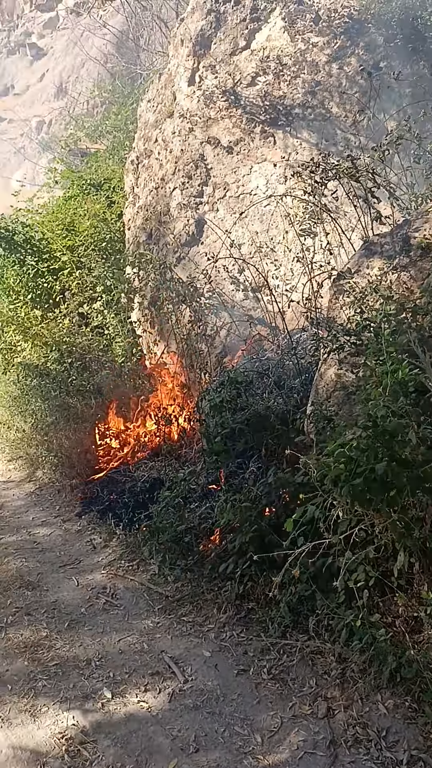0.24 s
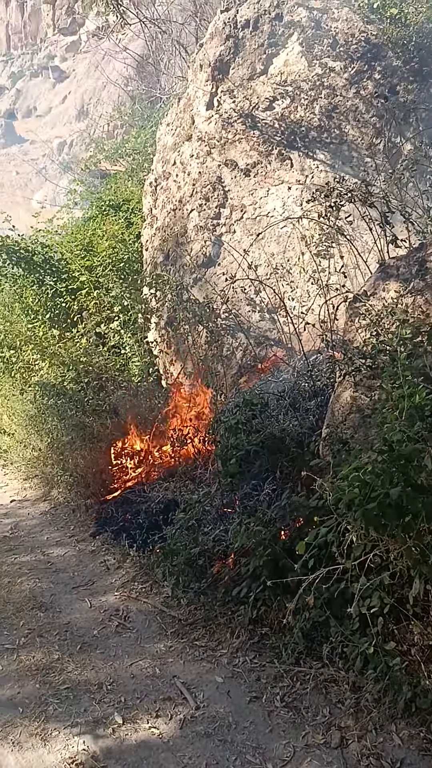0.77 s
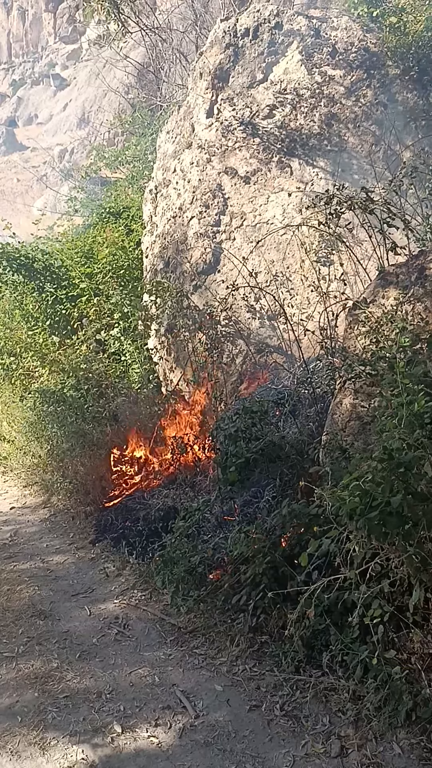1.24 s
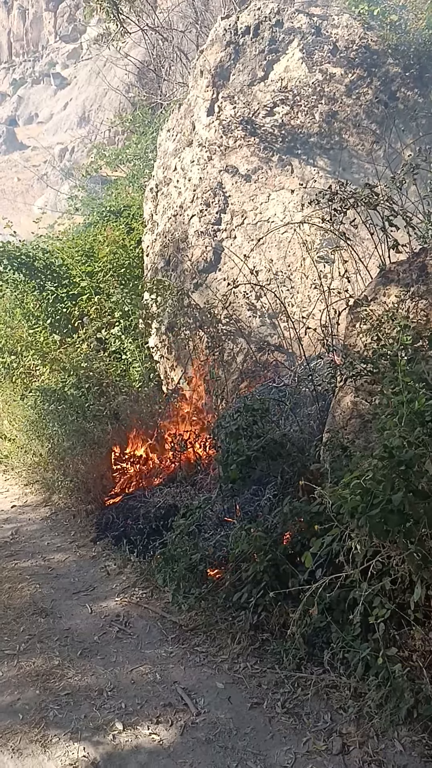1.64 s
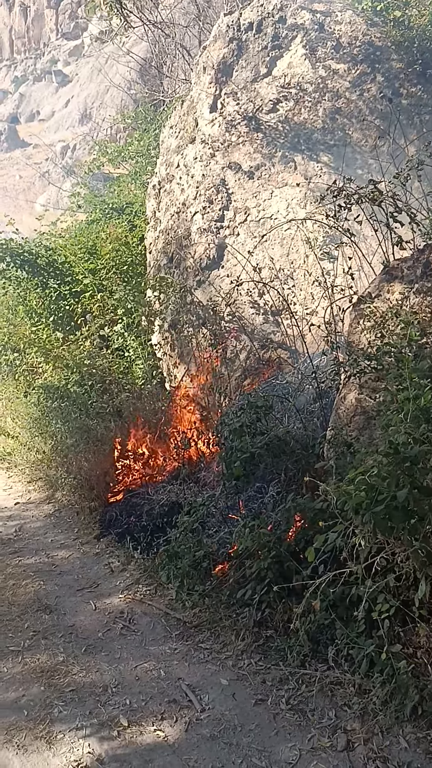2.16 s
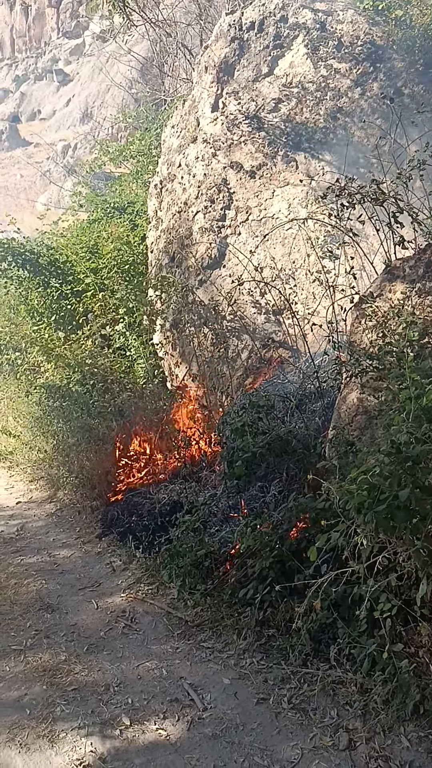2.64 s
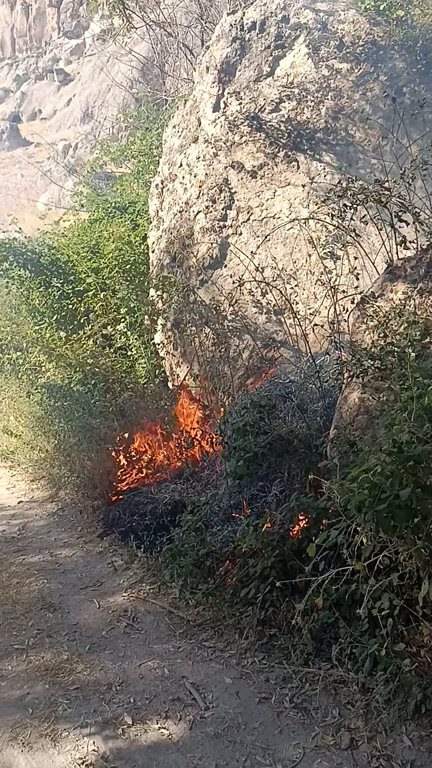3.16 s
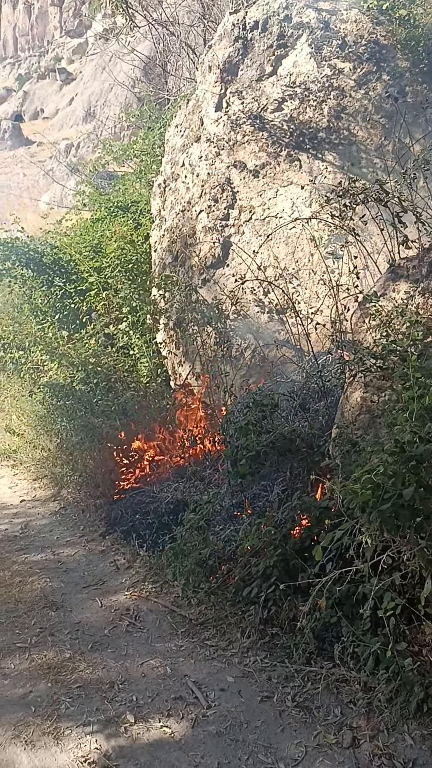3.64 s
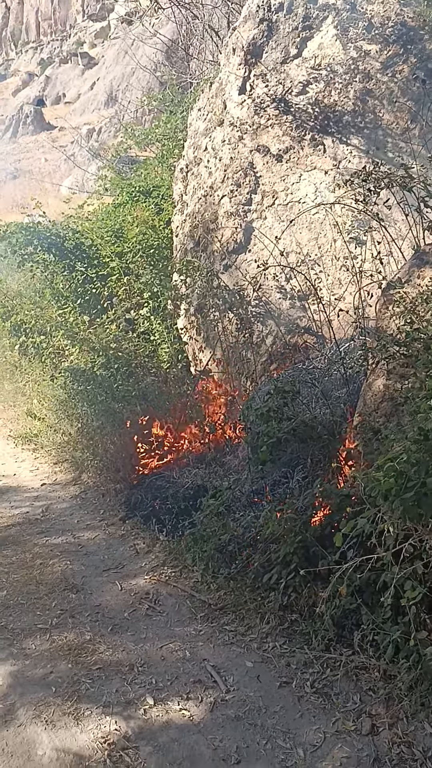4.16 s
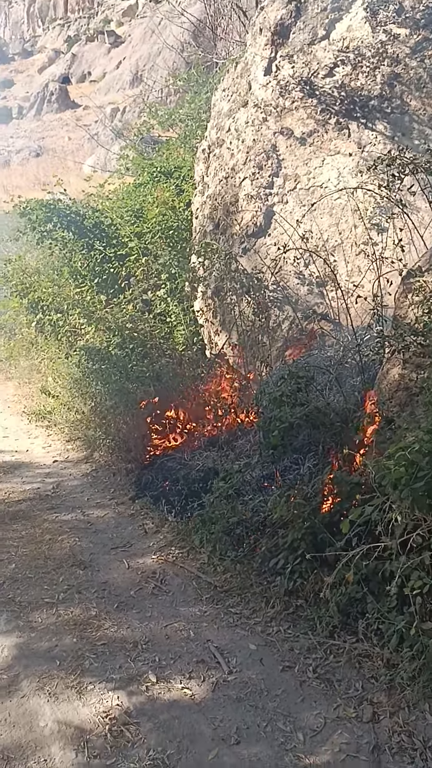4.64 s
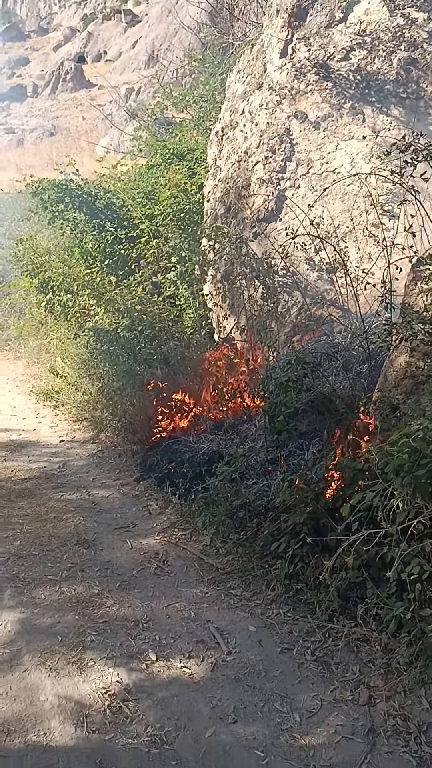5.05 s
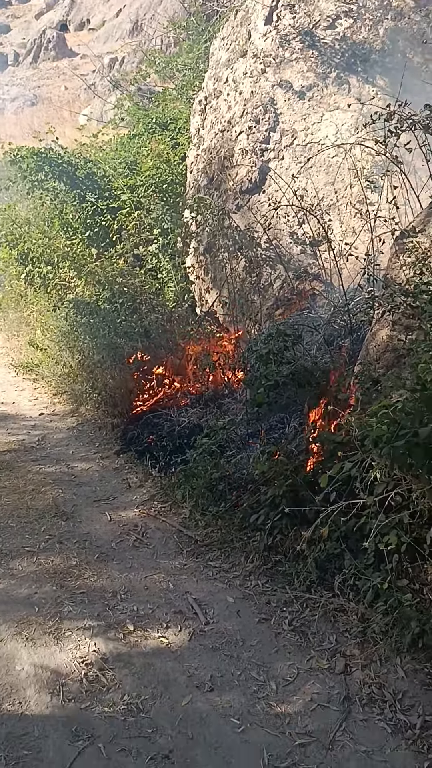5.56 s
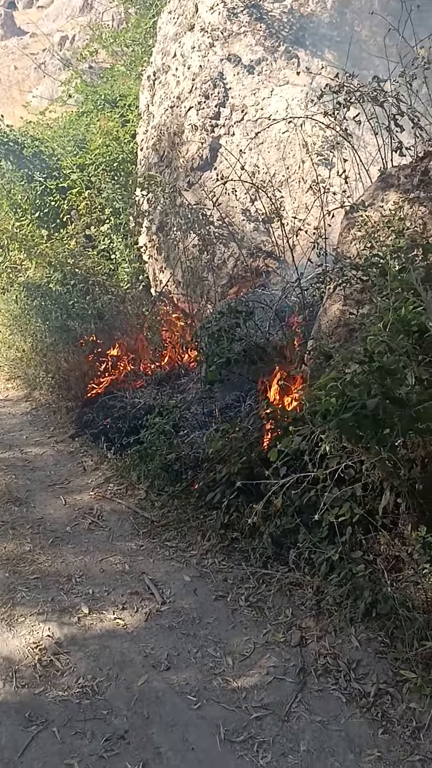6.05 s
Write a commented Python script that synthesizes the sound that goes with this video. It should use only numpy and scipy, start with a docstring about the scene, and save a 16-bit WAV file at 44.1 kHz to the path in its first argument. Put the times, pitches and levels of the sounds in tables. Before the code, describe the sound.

Burning twigs crackle and snap a few metres away, with soft wind rumble and a few light footsteps on grit.

```python
"""Twigs pop and crackle over a fine sizzle as dry brush burns beside a rock, a few metres from a phone.
Narrow bands of hiss swell and fade within the sizzle, and steam whistles briefly from twig ends.
Three footsteps crunch and snap on grit and dry leaves; eddies of the breeze thump on the microphone.
The phone's noise suppressor sinks the quiet moments band by band."""
import sys
import numpy as np
from scipy import signal
from scipy.fft import rfft, irfft
from scipy.io import wavfile
from scipy.ndimage import uniform_filter1d, minimum_filter1d

SR = 44100
rng = np.random.default_rng(int(sys.argv[2]) if len(sys.argv) > 2 else 0)


def to_wav(s):
    """Save 16-bit WAV."""
    ch = np.atleast_2d(s).T  # columns
    pcm = np.round(np.clip(ch, -1, 1) * 32767)  # PCM
    wavfile.write(sys.argv[1], SR, pcm.astype(np.int16))


N = 278428

# Course of the sizzle. Each row: time in seconds, level in dB, treble relative to that level in dB.
SIZZLE_LEVELS = [(0, -58, -21.5), (.6, -64.5, -15), (.87, -64, -38.5), (.92, -65.5, -12), (1.0, -61.5, -30),
                 (1.4, -58, -13.5), (1.45, -67, -14), (1.52, -60.5, -10), (1.8, -58, -11.5),
                 (1.9, -61.5, -12), (2.2, -66, 0), (2.35, -60.5, -6), (3.1, -59, -2), (3.32, -57.5, -3),
                 (3.53, -62.5, -0.5), (3.59, -64, 0.5), (4.05, -60, -2), (4.2, -64.5, 0), (4.55, -61.5, -3),
                 (4.63, -61.5, 1), (4.67, -69.5, 1.5), (4.76, -64, 2), (5.12, -63, -2.5), (5.22, -59, -4),
                 (5.38, -61, -2), (5.48, -59, 2.5), (5.6, -65, 1), (5.87, -59, -7.5), (6.12, -62, -13.5),
                 (6.17, -73.5, -1.5), (6.31, -66.5, -7.5)]
# Spectra of the three registers of a crackle. Each row: frequency in Hz, gain in dB.
BODY_SPECTRUM = [(900, -52.5), (1500, -13), (2300, -9), (3000, -6.5), (5800, -4), (7000, -9), (8200, -24),
                 (9500, -25.5)]
TREBLE_SPECTRUM = [(6500, -40.5), (8000, -11.5), (11000, -9.5), (13800, -15.5), (15000, 1), (15800, 2),
                   (16100, -39), (17500, -67)]
LOW_MID_SPECTRUM = [(170, 0), (350, -5.5), (550, -7.5), (930, 2), (1300, -8), (1700, -3), (3000, -45)]


def undb(db):
    """Decibels to amplitude ratio."""
    return 10 ** (np.asarray(db) / 20)


def unit(x):
    """Normalisation to rms 1."""
    return x / np.sqrt(np.mean(x ** 2))


def peak(x):
    """Normalisation to peak 1."""
    return x / np.abs(x).max()


def ring(x, hz, q):
    """A single resonance; q is centre frequency over bandwidth."""
    return signal.lfilter(*signal.iirpeak(hz, q, SR), x)


def highpass(x, hz, order=4):
    """High-pass filter, falling 6 dB per octave for each order."""
    return signal.sosfilt(signal.butter(order, hz, "high", fs=SR, output="sos"), x)


def colour(x, spectrum):
    """Minimum-phase filter, made by folding the cepstrum of the given spectrum."""
    hz, db = np.transpose(spectrum)
    grid_hz = np.maximum(np.fft.rfftfreq(4096, 1 / SR), 1)
    cepstrum = irfft(np.log(undb(np.interp(np.log(grid_hz), np.log(hz), db))))
    cepstrum[1:2048] *= 2
    cepstrum[2049:] = 0
    response = irfft(np.exp(rfft(cepstrum)))[:2048]
    return signal.fftconvolve(x, response)[:len(x)]


def curves(table):
    """Linear interpolation of a timed table's columns at every sample."""
    times, *columns = np.transpose(table)
    return [np.interp(np.arange(N) / SR, times, column) for column in columns]


def wander(per_s):
    """Slow fluctuation: random steps, smoothed twice; rms 1."""
    hold = int(SR / per_s)
    stairs = np.repeat(rng.standard_normal(N // hold + 1), hold)
    return unit(uniform_filter1d(uniform_filter1d(stairs, hold), hold)[:N])


def add(out, start_s, sound):
    """Superposition of a sound on the mix."""
    i = max(int(start_s * SR), 0)
    out[i:i + len(sound)] += sound[:N - i]


def grains(per_s, spread_db, tail_s):
    """Shot noise: random clicks whose decaying noisy tails add in power; rms 1."""
    hit, size = rng.random(N) < per_s / SR, rng.exponential(size=N)
    t = np.arange(int(.02 * SR)) / SR
    energy = hit * undb(2 * spread_db * np.minimum(size, 4))
    power = signal.fftconvolve(energy, np.exp(-2 * t / tail_s))[:N]
    return unit(np.sqrt(np.maximum(power, 0)) * rng.standard_normal(N))


def crackle(per_s, spread_db, tail_s, hiss, flicker_db, q):
    """Pieces of each size resonate at their own pitch, over plain clicks and hiss; rms 1."""
    out = grains(per_s, spread_db, tail_s) + hiss * rng.standard_normal(N)
    for hz in np.geomspace(1600, 7000, num=6):
        out += 0.34 * unit(ring(grains(per_s / 4, spread_db, tail_s), hz, q))
    return unit(out * undb(flicker_db * wander(30)))


def self_noise(level_db=-80.5):
    """The phone's electronics set a faint, steady noise floor."""
    # Spectrum of the floor. Each row: frequency in Hz, gain in dB.
    floor_spectrum = [(60, -38), (150, -4.5), (300, -8), (500, -13), (1200, -20), (2500, -24.5),
                      (8000, -29.5), (16000, -56)]
    return undb(level_db) * unit(colour(rng.standard_normal(N), floor_spectrum))


def breeze(width_cycles=0.53):
    """Turbulence: eddies crossing the microphone port make a fluttering rumble and short thumps."""
    # Course of the rumble. Each row: time in seconds, level in dB.
    rumble_levels = [(0, -51), (.4, -66), (.64, -51.5), (.7, -39.5), (.86, -71.5), (1.12, -56.5),
                     (1.28, -66.5), (1.7, -59.5), (1.9, -44.5), (2.07, -54.5), (2.26, -57), (2.42, -61.5),
                     (2.53, -59.5), (2.74, -60.5), (2.93, -49), (3.1, -68.5), (3.48, -87), (3.7, -63),
                     (4.06, -73), (4.16, -82.5), (4.69, -81.5), (4.8, -60.5), (5.15, -61.5), (5.27, -80),
                     (5.46, -76), (5.56, -60), (5.95, -50.5), (6.04, -63), (6.31, -50)]
    # Spectrum of the rumble. Each row: frequency in Hz, gain in dB.
    rumble_spectrum = [(20, -26.5), (40, -2.5), (80, 2), (150, -4.5), (230, -20), (330, -47), (500, -60)]
    # The strongest eddies. Each row: centre in seconds, envelope peak in dB, frequency in Hz.
    buffets = [(0.021, -39, 102), (0.152, -53, 66), (0.333, -41.5, 115), (0.584, -24.5, 74.5),
               (.603, -30.5, 151), (.678, -31.5, 96), (0.691, -28, 100), (0.726, -32, 104),
               (.778, -40.5, 107), (0.832, -43, 82), (1.049, -40, 101), (1.102, -39, 95),
               (1.132, -43, 69.5), (1.389, -45.5, 63), (1.48, -36.5, 99.5), (1.843, -37, 115),
               (1.9, -30.5, 93), (1.927, -30, 127), (1.944, -41, 128), (1.999, -57, 86), (2.073, -41.5, 98),
               (2.163, -42, 102), (2.422, -44.5, 85.5), (2.62, -45.5, 95), (2.672, -47, 72.6),
               (2.81, -39.5, 108), (2.875, -37, 64), (2.894, -36.5, 106), (2.94, -43, 115),
               (3.709, -31.5, 104), (4.044, -38, 98), (5.031, -41, 90), (5.057, -38.5, 94),
               (5.143, -40, 79), (5.162, -38, 74), (5.578, -40, 105), (5.694, -40.5, 82), (5.836, -38, 63),
               (5.891, -40, 111), (5.919, -37, 97), (5.951, -34.5, 81), (6.149, -43, 100), (6.192, -40, 99),
               (6.244, -36, 80)]
    rumble_db = curves(rumble_levels)[0] + 4.5 * wander(22) + 2.9 * wander(6)
    out = undb(rumble_db) * unit(colour(rng.standard_normal(N), rumble_spectrum))
    for (centre_s, peak_db, hz), phase in zip(buffets, rng.random(len(buffets))):
        cycles = np.arange(-3 * width_cycles, 3 * width_cycles, hz / SR)
        envelope = undb(peak_db) * np.exp(-(cycles / width_cycles) ** 2)
        wave = np.sin(2 * np.pi * (cycles + phase)) + 0.026 * np.sin(5.5 * np.pi * cycles)
        add(out, centre_s - 3 * width_cycles / hz, envelope * wave)
    return out


def footsteps(roll_from_db=-16.5, lift_db_per_s=-170, low_db_per_s=-110):
    """Granular noise: grit and leaves under a rolling shoe crunch, swelling, holding and settling."""
    # Footfalls, the first as heel then sole. Each row: start, roll-on and hold in seconds, crunch in dB,
    # low mids relative to the crunch in dB, thud of the sole relative to the low mids in dB.
    footfalls = [(0.304, .016, 0.0044, -45.5, -6, -14.5), (0.348, 0.0067, 0.016, -37.5, -3.5, -7),
                 (1.85, 0.034, 0.059, -43.5, -8.5, -27), (3.616, 0.12, 0.034, -42, -8.5, -23)]
    grit = crackle(900, spread_db=1.5, tail_s=0.0011, hiss=0.78, flicker_db=1.6, q=4.2)
    body, treble, low = (unit(colour(grit, spectrum))
                         for spectrum in (BODY_SPECTRUM, TREBLE_SPECTRUM, LOW_MID_SPECTRUM))
    thud = unit(ring(low, hz=380, q=1.1))
    out = np.zeros(N)
    for start_s, roll_s, held_s, crunch_db, low_db, thud_db in footfalls:
        t = np.arange(N) / SR - start_s
        roll_db = roll_from_db * np.clip(1 - t / roll_s, 0, 1)
        lifted_s = np.maximum(t - roll_s - held_s, 0)
        settling = undb(-9.5 - 40 * lifted_s)  # leaves spring back after the step
        fall = np.hypot(undb(lift_db_per_s * lifted_s), settling)
        envelope = (t > 0) * undb(crunch_db + roll_db) * fall
        fullness = undb(low_db + roll_db + low_db_per_s * lifted_s)  # the low mids die first
        out += envelope * (body + undb(-8) * treble + fullness * (low + undb(thud_db) * thud))
    return out


def whistles(breathy=0.25):
    """Steam forced through a pore sounds a narrow resonance: a fluttering tone with a breathy edge."""
    # Whistles at twig ends. Each row: start and length in seconds, pitch and bandwidth in Hz,
    # rms level before the taper in dB.
    tones = [(0.731, .05, 1650, 190, -63), (1.67, 0.038, 1430, 140, -75), (1.715, 0.04, 1610, 295, -47.5),
             (2.149, 0.021, 1630, 295, -53), (3.365, .07, 1487, 160, -64), (4.605, 0.053, 1414, 190, -65),
             (5.447, 0.063, 2020, 149, -69)]
    out = np.zeros(N)
    for start_s, length_s, hz, width_hz, db in tones:
        broad = ring(rng.standard_normal(SR // 4), hz, hz / width_hz)
        narrow = ring(broad, hz, hz / width_hz)
        tone = unit(unit(narrow) + breathy * unit(broad))[-int(length_s * SR):]
        add(out, start_s, undb(db) * tone * np.sqrt(np.hanning(len(tone))))
    return out


def hiss_bands(width_hz=260, swing_db=6):
    """Amplitude modulation: narrow bands of hiss swell and fade independently; rms 1."""
    noise = rng.standard_normal(N)
    out = np.zeros(N)
    for hz in np.linspace(1500, 7200, num=20):
        band = ring(ring(noise, hz, hz / width_hz), hz, hz / width_hz)
        out += band * undb(swing_db * np.tanh(wander(8.1)))
    return unit(out)


def sizzle():
    """Countless tiny crackles sum incoherently with narrow bands of hiss that swell and fade."""
    level_db, treble_db = curves(SIZZLE_LEVELS)
    twigs = crackle(520, spread_db=4.0, tail_s=0.0015, hiss=0.07, flicker_db=1.98, q=1.2)
    body = unit(highpass(colour(twigs + 0.45 * hiss_bands(), BODY_SPECTRUM), 1900))
    treble = undb(treble_db) * unit(colour(twigs, TREBLE_SPECTRUM))
    low = undb(-29) * unit(colour(twigs, LOW_MID_SPECTRUM))
    return undb(level_db) * (body + treble + low)


def small_pops(per_s=50, over_sizzle_db=14, spread_db=4):
    """A random point process: rows for cracks() that follow the level and treble of the sizzle."""
    level_db, treble_db = curves(SIZZLE_LEVELS)
    when, size, pitch, dullness = rng.random((int(per_s * N / SR), 4)).T
    at = (when * (N - 1)).astype(int)
    body_db = level_db[at] + over_sizzle_db - spread_db * np.log(np.clip(size, .08, 1))
    ring_hz = 2400 * 2 ** (1.4 * pitch)
    return list(zip(at / SR, body_db, ring_hz, body_db + treble_db[at] - 14 * dullness, body_db - 40.5))


def cracks(ground_reflection=0.43, ring_q=3.5, port_hz=13400):
    """Impulse response: a twig pops or grit snaps and rings; ground, rock and brush reflect the crack."""
    # Sharp cracks: pops of burning twigs and snaps of grit underfoot. Each row: start in seconds,
    # peak of the body in dB, resonance in Hz, peak of the treble in dB, peak of the low mids in dB.
    sharp_cracks = [(.0498, -48, 4870, -40.5, -60), (0.1022, -35.5, 4070, -33, -75),
                    (0.1135, -38, 5670, -44, -76), (.1246, -63, 6460, -44, -79),
                    (.2037, -36, 5000, -42, -64), (0.2717, -35, 5030, -68, -70.5),
                    (0.3191, -21.5, 6400, -35, -39.5), (.3346, -39, 6420, -45, -56),
                    (0.356, -19, 1810, -39, -40), (0.368, -21, 3400, -37.5, -55.5),
                    (.3787, -19.5, 3140, -38, -49), (.4788, -31, 4970, -45, -53),
                    (.486, -35.5, 4970, -33, -46), (0.5549, -28, 3770, -45, -52),
                    (0.6297, -28.5, 2100, -65, -52), (0.6499, -25, 2620, -38.5, -70),
                    (0.6607, -34.5, 5050, -35, -50), (.687, -29.5, 3000, -46, -49.5),
                    (.779, -36, 4970, -37.5, -83), (0.8438, -39.5, 5430, -40, -82),
                    (0.8564, -35.5, 3200, -56, -77), (0.8644, -33.5, 3320, -53, -61),
                    (0.9604, -32, 3670, -38, -64), (1.0221, -35, 5450, -65, -77),
                    (1.0396, -32.5, 4470, -68, -57), (1.0719, -34, 3100, -60, -79),
                    (1.1913, -22, 5200, -31, -53), (1.209, -23, 5800, -20.5, -56),
                    (1.288, -39.5, 3520, -54, -57), (1.362, -36, 4870, -75, -76),
                    (1.4045, -38, 2800, -63.5, -88), (1.456, -40, 4020, -55, -56),
                    (1.4905, -30, 3600, -62, -77), (1.5335, -31, 2850, -48, -78),
                    (1.5653, -53, 5150, -70, -89), (1.6686, -36, 2810, -45, -81),
                    (1.683, -37, 3000, -69, -80), (1.824, -31, 3800, -48.5, -60),
                    (1.8466, -22, 6060, -39, -53), (1.8707, -27, 1660, -59, -78),
                    (1.8932, -23, 2660, -52, -44), (1.9103, -26.5, 1750, -51, -59),
                    (2.0393, -45, 2670, -37, -77), (2.0594, -32.5, 2660, -32.5, -81),
                    (2.106, -25, 3700, -19.5, -93), (2.176, -29.5, 5340, -26.5, -96),
                    (2.2833, -26, 5070, -30.5, -74), (2.304, -27.5, 2900, -29, -81),
                    (2.3272, -35, 4550, -36, -70), (2.3689, -27.5, 4260, -29.5, -66),
                    (2.432, -37, 4040, -39.5, -72), (2.478, -39, 5210, -33, -67),
                    (2.4935, -35.5, 5250, -33, -68), (2.5248, -34, 2800, -39, -91),
                    (2.574, -31, 4260, -53.5, -58), (2.615, -31.5, 2980, -33, -90),
                    (2.663, -34, 4390, -33, -84), (2.684, -44, 5070, -33, -87),
                    (2.7266, -32.5, 3380, -33, -82), (2.7483, -32, 4640, -32, -76),
                    (2.7755, -33.5, 5900, -53, -85), (2.8303, -33, 2610, -58, -89),
                    (3.0343, -32.5, 5630, -35.5, -56.5), (3.144, -35, 4910, -38.5, -83),
                    (3.22, -19.5, 5370, -37, -38.5), (3.24, -42.5, 6700, -33.5, -96),
                    (3.285, -39, 4870, -47, -64), (3.3226, -34.5, 4400, -34, -84),
                    (3.3395, -34, 4010, -51, -92), (3.439, -30.5, 6000, -29, -74),
                    (3.509, -31, 3120, -36, -96), (3.6661, -28.5, 6400, -34, -52),
                    (3.6908, -25, 5800, -22, -41.5), (3.703, -24.5, 2620, -55, -54),
                    (3.7942, -41, 6560, -26.5, -57), (3.8118, -43, 3540, -27.5, -49),
                    (3.8846, -26, 6200, -34, -46), (3.905, -33.5, 3220, -35, -83),
                    (3.9185, -33, 6600, -35, -52), (3.9768, -26.5, 5840, -26, -57),
                    (4.0036, -30, 5280, -31, -65), (4.022, -30, 5800, -22.5, -78),
                    (4.127, -39, 4500, -43.5, -73), (4.37, -44, 7400, -39, -66),
                    (4.4174, -31.5, 5330, -24.5, -81), (4.4335, -22.5, 3030, -35, -47),
                    (4.4525, -26.5, 3070, -29.5, -41), (4.4722, -33, 6590, -46, -67),
                    (4.5054, -36.5, 3200, -35, -90), (4.5243, -27, 4350, -45, -50.5),
                    (4.6023, -42.5, 5380, -35, -65), (4.7209, -34.5, 3270, -39.5, -72),
                    (4.737, -37.5, 5870, -41, -72), (4.7513, -31.5, 5460, -39, -79),
                    (4.778, -34.5, 3280, -46, -81), (4.8887, -33.5, 3000, -38, -93),
                    (5.0053, -33, 3300, -37, -60.5), (5.0192, -28.5, 5500, -19.5, -64),
                    (5.028, -19.5, 6740, -15, -60), (5.074, -38.5, 4930, -35.5, -85),
                    (5.215, -39, 5300, -58.5, -85), (5.225, -39.5, 1860, -60, -47.5),
                    (5.235, -39.5, 3050, -37, -60), (5.274, -43.5, 4500, -41, -80),
                    (5.321, -37.5, 2860, -41.5, -69), (5.339, -26.5, 5400, -43, -64),
                    (5.4969, -48, 4250, -35.5, -69), (5.6703, -35.5, 6860, -36.5, -60),
                    (5.772, -28, 2350, -37, -35.5), (5.7955, -30.5, 3000, -30.5, -83),
                    (5.8068, -31, 2880, -42, -85), (5.8591, -39, 2960, -56, -85),
                    (5.9163, -33, 3430, -53, -83), (5.8813, -41.5, 2810, -63.5, -82),
                    (5.953, -40, 7280, -48.5, -84), (5.9748, -38.5, 4800, -64, -85),
                    (5.9943, -39.5, 5200, -51.5, -85), (6.0293, -30.5, 4860, -34.5, -86),
                    (6.0892, -25, 3660, -30, -82), (6.2247, -34.5, 5600, -37.5, -69.5)]
    rows = sharp_cracks + small_pops()
    out, t = np.zeros(N), np.arange(int(.12 * SR)) / SR
    impulse = 1. * (t == 0)
    crumble = undb(-11) * np.exp(-t / 0.00026)
    scatter = undb(-29) * np.exp(-t / 0.0061) + undb(-42) * np.exp(-t / 0.036)
    port_ring = ring(impulse, port_hz, q=15.0)  # the crack also rings the microphone port
    tick = peak(highpass(0.17 * impulse + port_ring, 8200, order=3))
    heights, noises = rng.random(len(rows)), rng.standard_normal((len(rows), len(t)))
    for (start_s, body_db, ring_hz, treble_db, low_db), height, noise in zip(rows, heights, noises):
        tail = (crumble + scatter) * noise
        crack = impulse + tail
        echo_lag = int((.0004 + 0.0012 * height) * SR)
        bounced = crack + ground_reflection * np.pad(crack, (echo_lag, 0))[:len(t)]
        body = peak(ring(bounced, ring_hz, ring_q)) + 1.36 * peak(colour(bounced, BODY_SPECTRUM))
        body = peak(highpass(body, min(2100, 0.67 * ring_hz)))  # small pieces radiate lows poorly
        treble = peak(tick + 0.5 * peak(colour(tail, TREBLE_SPECTRUM)))
        low = peak(ring(ring(bounced, 1400, q=1.9), 1400, q=1.9))
        add(out, start_s, undb(body_db) * body + undb(treble_db) * treble + undb(low_db) * low)
    return out


def suppress(x, over_db=6.0, depth_db=-14, memory=0.53, release=0.46, hold_frames=12):
    """Spectral gating: a band opens when it stands over its usual quiet level, holds, then closes."""
    spectra = signal.stft(x, nperseg=512, noverlap=384)[2]
    power = uniform_filter1d(np.abs(spectra) ** 2, 3, axis=0)
    power = signal.lfilter([1 - memory], [1, -memory], power, axis=1)
    threshold = np.percentile(power, 25, axis=1, keepdims=True) * undb(2 * over_db)
    opening = np.maximum(1 - threshold / (power + 1e-18), 0)
    # the hold starts two frames early, so that no attack is dulled
    opening = -minimum_filter1d(-opening, size=hold_frames, axis=1, origin=hold_frames // 2 - 3)
    for i in range(1, opening.shape[1]):
        opening[:, i] = np.maximum(opening[:, i], release * opening[:, i - 1])
    gain = undb(depth_db) + (1 - undb(depth_db)) * opening
    return signal.istft(spectra * gain, nperseg=512, noverlap=384)[1][:N]


def scene():
    """Superposition: row 0 reaches the phone by air, row 1 arises at its port and in its electronics."""
    floor = self_noise()
    airborne = cracks() + whistles() + sizzle() + footsteps()
    return np.array([airborne, breeze() + floor])


def record(dry):
    """Gating acts on the airborne sound alone; band limiting then cuts the deepest bass and the top."""
    mix = highpass(suppress(dry[0]) + dry[1], 48, order=2)
    top_cut = signal.ellip(10, .2, 75, 16900, fs=SR, output="sos")
    return signal.sosfilt(top_cut, mix)[None]


dry = scene()
out = record(dry)
to_wav(out)
```